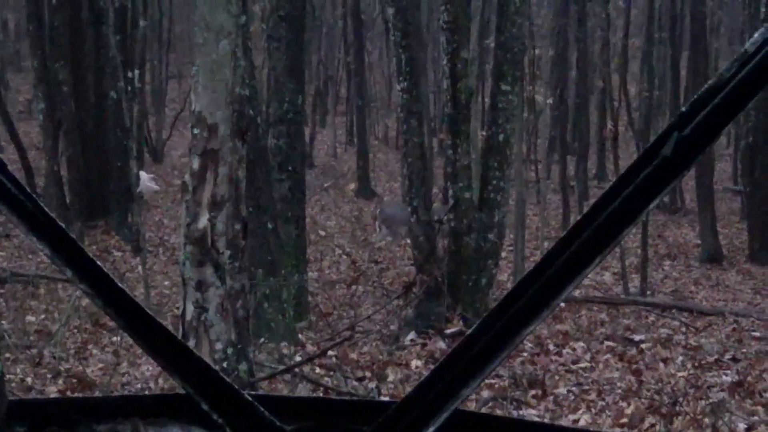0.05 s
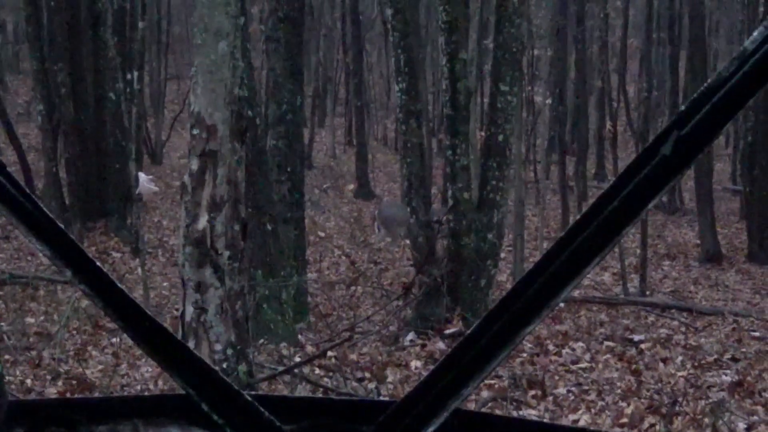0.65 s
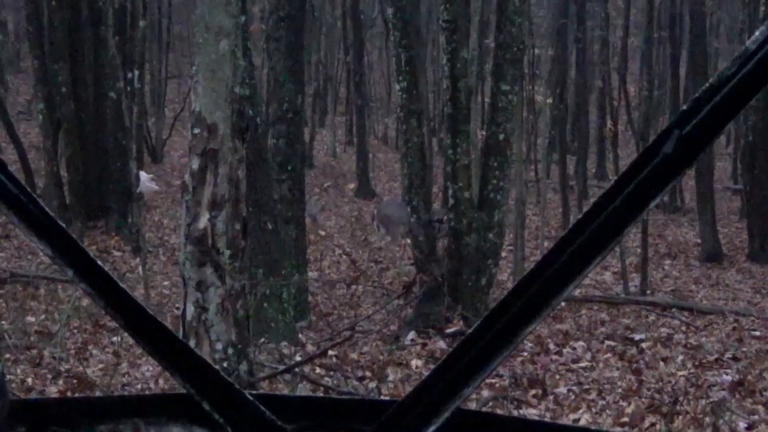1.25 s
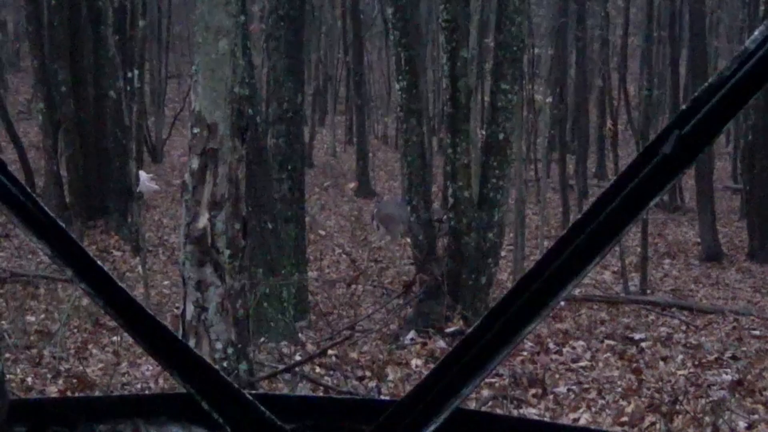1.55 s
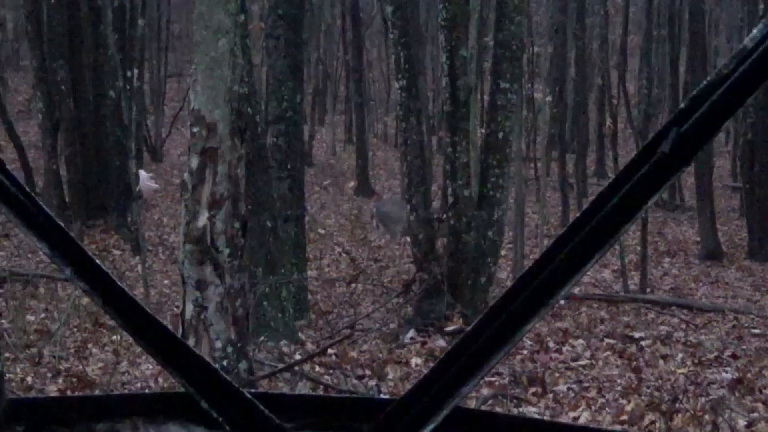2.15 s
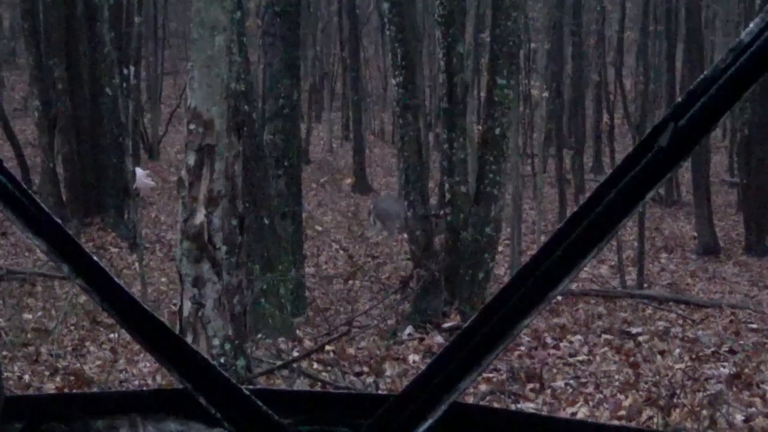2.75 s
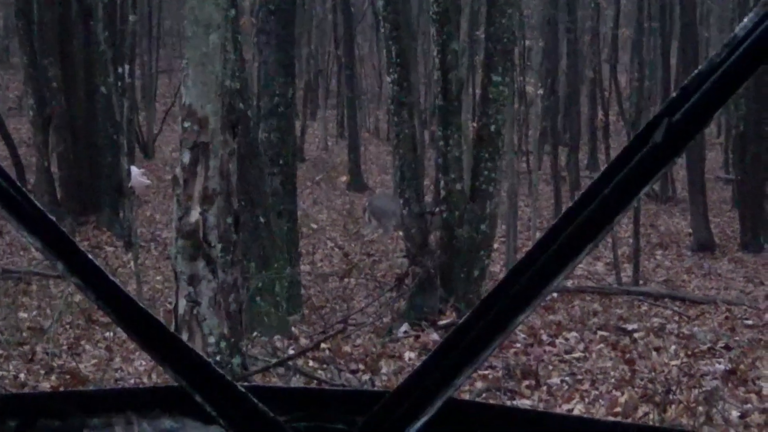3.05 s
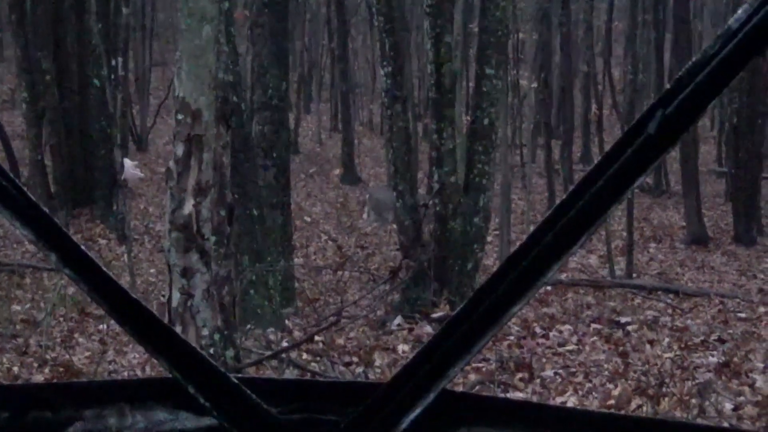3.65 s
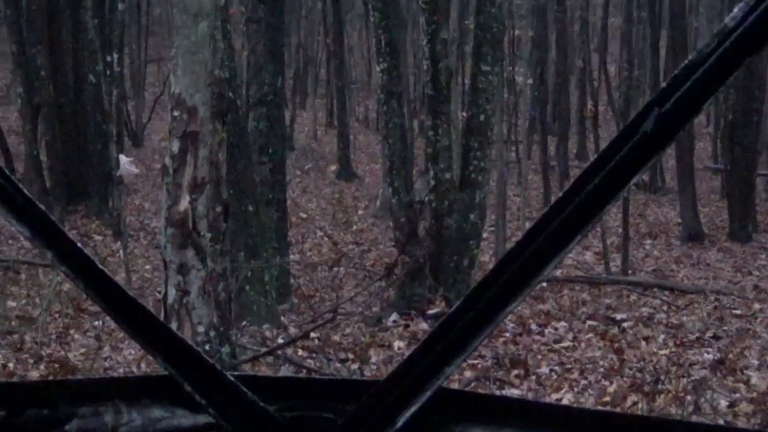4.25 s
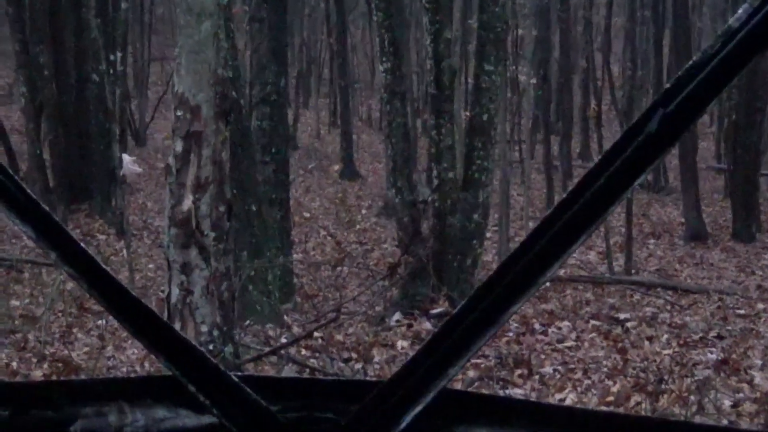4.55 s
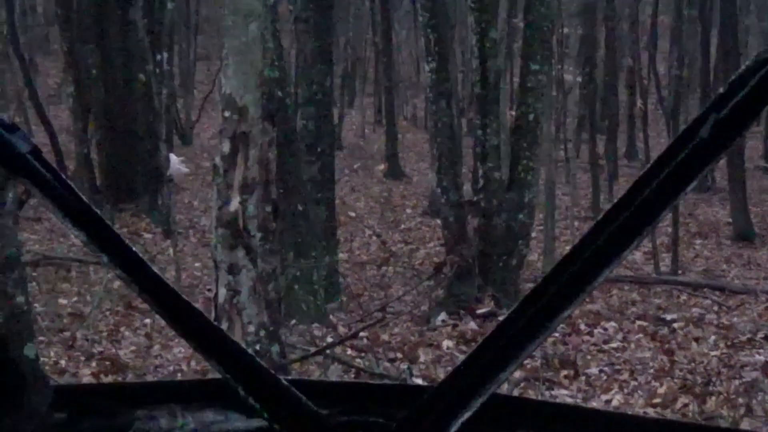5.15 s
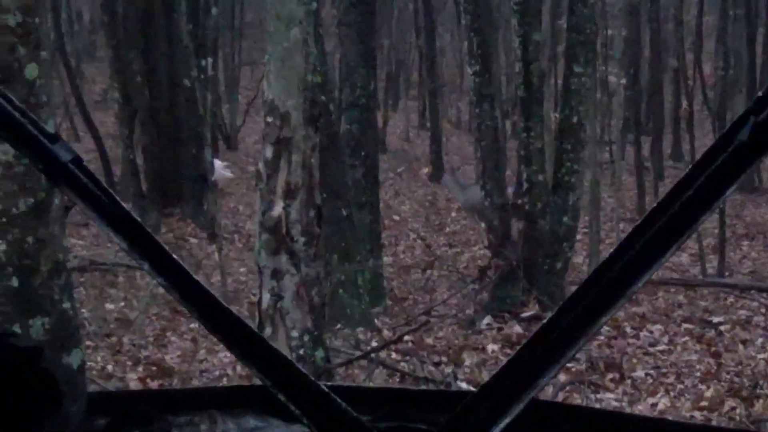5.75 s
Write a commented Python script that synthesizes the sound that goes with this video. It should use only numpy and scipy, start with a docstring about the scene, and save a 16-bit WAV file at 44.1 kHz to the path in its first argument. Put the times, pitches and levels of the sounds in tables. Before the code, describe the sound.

Light rain falls in the woods, heard from inside a fabric blind. A steady soft hiss with tiny ticks comes from the fallen leaves, over a faint low rumble. Close by, single drops pat irregularly on the cloth. About a second and a half in, one heavy drop gives a louder, sharp tap, and in the second half the pats grow somewhat stronger.

```python
"""Light rain on a fabric blind in the woods, heard from inside.
From the start, countless impacts on fallen leaves merge into a soft hiss over a faint low rumble.
Nearer drops pat the cloth: each impulse sets a patch ringing briefly while its spray scatters.
At 1.4 s one heavy drop gives a loud tap; from about 3.4 s to the end the pats are stronger."""
import sys
import numpy as np
from scipy import signal
from scipy.io import wavfile
from scipy.ndimage import uniform_filter1d

SR = 44100
rng = np.random.default_rng(int(sys.argv[2]) if len(sys.argv) > 2 else 0)


def file_out(sig):
    """Save sig as 16-bit WAV at sys.argv[1]."""
    # one column per channel
    cols = np.atleast_2d(sig).T
    # limit, then scale
    lim = np.clip(cols, -1, 1)
    pcm = np.round(lim * 32767).astype(np.int16)
    wavfile.write(sys.argv[1], SR, pcm)


N = 255780

# Prominent drops, each on its own patch of cloth: t/s, slap level/dB, lowest f of the patch/Hz,
# ring f/Hz, ring level re slap/dB, spray level/dB, left-right difference/dB
DROPS = [(0.3143, -45, 2400, 3290, -2, -63, -1.5), (0.401, -48.5, 170, 2430, -7, -49, -2.5),
         (1.1295, -50, 2000, 9470, -7, -51, -2.5), (1.2239, -44, 170, 1856, -5, -51, -2),
         (1.4917, -42.5, 800, 1680, -9, -55, 1), (1.809, -47.5, 600, 3790, -24, -48, -2),
         (1.971, -46.5, 1100, 5720, -6, -53, 1), (2.266, -54.5, 200, 1640, -8, -44, -2),
         (2.6603, -48, 1500, 4140, -2, -60, -3.5), (2.7046, -44, 450, 2050, -11, -66, 1),
         (2.7235, -45.5, 220, 2670, -8, -42.5, -2), (2.773, -42.5, 450, 632, 5, -47, -0.5),
         (2.830, -45.5, 200, 1430, -15, -46.5, 1), (3.4323, -32.5, 398, 3400, -12, -37, -1.5),
         (3.527, -31.5, 700, 830, -7.5, -48, 0), (3.5798, -49, 900, 3200, -14, -49, 2),
         (3.781, -46.5, 250, 2450, -10, -45, 0), (4.0242, -43.5, 300, 920, 4, -62, -2),
         (4.078, -45, 450, 1040, -6, -62, -2), (4.2698, -35.5, 170, 1563, -1.5, -55, 2),
         (4.2732, -34.5, 1000, 1750, -4, -41, -2), (4.551, -39, 170, 579, -5, -42, -2),
         (4.569, -46, 1200, 2620, 3, -46.5, 2.5), (4.6051, -40.5, 700, 2900, -10, -47, 3),
         (4.9423, -50, 400, 3440, -9, -47, -1), (5.0617, -39, 170, 760, -8, -58, -1),
         (5.07, -44.5, 260, 1380, -2, -52, 0), (5.3603, -34.5, 540, 2080, -1, -59, -4),
         (5.6194, -42.5, 232, 1570, -3, -54, 0)]


def patter():
    """Superposition: the sounds of separate impacts on the cloth add."""
    out = np.zeros((2, N))
    for onset, *impact in DROPS:
        add(out, onset, drop(*impact))
    return out


def drop(slap_db, lowest_hz, ring_hz, ring_db, spray_db, side_db, ring_cycles=13):
    """Impulse response of a membrane: a slap and the damped ring of the patch, joined by spray."""
    slack_hz, cloth_hz = 170, 2720
    bass_db = 11.5 - 7.5 * np.log2(lowest_hz / slack_hz)  # a slack patch thuds
    treble_db = -8.5 + 0.48 * (spray_db - slap_db)  # a drop that bursts slaps brighter
    spray_hz = cloth_hz * (ring_hz / cloth_hz) ** 0.22  # between the tones of cloth and patch
    colour = [(250, bass_db - 1.5), (500, bass_db), (850, 0.4 * bass_db + 2.5), (1700, 0.61),
              (3600, 0.23 * treble_db), (5800, treble_db + 4.0), (10500, 1.02 * treble_db)]
    slap = through(contact(flutter_db=4, t60=0.025), click(colour))
    # a taut patch hardly sounds below its lowest tone
    slap = burst(signal.lfilter(*signal.butter(3, lowest_hz, "highpass", fs=SR), slap))
    t = np.arange(slap.shape[1]) / SR
    attack = 1 - np.exp(-t / 0.00076)
    decay = amp(-60 * t / (0.022 + ring_cycles / ring_hz))
    ring = burst(np.sin(2 * np.pi * ring_hz * t) * attack * decay)
    ring *= np.sign(np.sum(slap * ring))  # the patch swings the way it is pushed
    pat = amp(slap_db) * burst(slap + amp(ring_db) * ring)
    return pan(side_db) * (pat + spray(spray_db, t60=0.12, tone_hz=spray_hz, treble_db=treble_db))


def contact(flutter_db, t60, spread_hz=2600, spread_q=1.17, flutter_hz=900):
    """Wave propagation: one sharp push, then short waves running to and fro in the cloth."""
    waves = amp(flutter_db) * scatter(rise_s=0.001, t60=t60, likeness=0.68, grain_db=5)
    waves = signal.lfilter(*signal.butter(1, [flutter_hz, 7000], "bandpass", fs=SR), waves)
    push = waves + burst(signal.unit_impulse(waves.shape[1]))
    # the cloth yields: an all-pass spreads the push over a millisecond
    return push - 2 * signal.lfilter(*signal.iirpeak(spread_hz, spread_q, fs=SR), push)


# Spectrum of the spray: f/Hz, relative level/dB
SPRAY_SPECTRUM = [(80, -18), (250, -1.5), (700, -1), (1200, 0.5), (2000, -2.5), (3300, 1), (5500, -0.5),
                  (9000, 1), (11000, -13.5)]


def spray(level_db, t60, tone_hz, treble_db, tone_db=3, tone_q=4.4):
    """Forced resonance: droplets from a splash fall back and stir the cloth around them."""
    colour = [(hz, db + 0.21 * treble_db * (hz > 5000)) for hz, db in SPRAY_SPECTRUM]
    droplets = through(scatter(rise_s=0.0044, t60=t60, likeness=0.69, grain_db=2), click(colour))
    stirred = signal.lfilter(*signal.iirpeak(tone_hz, tone_q, fs=SR), droplets)
    return amp(level_db) * burst(droplets + amp(tone_db) * stirred)


# The two contacts of the heavy drop: t/s, level/dB, left-right difference/dB
TAP_CONTACTS = [(1.4174, -35.5, 6), (1.42, -22, 0.5)]
# Spectrum of its knock: f/Hz, relative level/dB
TAP_SPECTRUM = [(300, -22), (385, 2.5), (540, 8), (900, 3.5), (1030, -10), (1380, -10), (1560, -1),
                (2100, -5), (2700, 4), (3540, 0.5), (3880, -11), (4450, 3.5), (4700, -9.5), (10500, -17.5)]


def heavy_tap():
    """Impact excitation: a large drop knocks the taut cloth close by and bursts."""
    out = np.zeros((2, N))
    for onset, level_db, side_db in TAP_CONTACTS:
        push = contact(flutter_db=-5, t60=0.016, spread_hz=3000, spread_q=1.5, flutter_hz=2800)
        knock = burst(through(push, click(TAP_SPECTRUM)))
        add(out, onset, -amp(level_db) * pan(side_db) * knock)
    add(out, TAP_CONTACTS[-1][0], spray(level_db=-33, t60=0.067, tone_hz=3150, treble_db=-12))
    return out


# Strength of the rain, used as swings about each mean: t/s, leaf level/dB, cloth level/dB
RAIN_STRENGTH = [(0.0, -56.5, -64), (0.77, -57, -61.5), (1.1, -58, -64), (2.55, -57.5, -63),
                 (3.39, -57, -60), (3.62, -55.5, -59.5), (3.83, -56.5, -63), (4.55, -56.5, -57),
                 (4.97, -57, -60.5), (5.8, -57, -62.5)]


def drizzle(base_db=-57.5, spread_db=1.4, spray_below_db=10, width_db=6, rain_follow=1.4, count=85):
    """Random arrivals: small drops tick or splash on the cloth, harder as the rain thickens."""
    out = np.zeros((2, N))
    times, rain_db, _ = np.transpose(RAIN_STRENGTH)
    for when, size, slack, dryness, patch, side in rng.random((count, 6)):
        onset = when * N / SR
        heavier_db = rain_follow * np.interp(onset, times, rain_db - rain_db.mean())
        slap_db = base_db + heavier_db + spread_db * min(-np.log(1 - size), 3)
        ring_hz = 600 * 8 ** patch
        sound = drop(slap_db, lowest_hz=ring_hz / 4 ** slack, ring_hz=ring_hz, ring_db=-4,
                     spray_db=slap_db - spray_below_db * dryness, side_db=width_db * (side - 0.5))
        add(out, onset, sound)
    return out


def leaf_ticks(level_db=-66, per_s=600, spread_db=3.5, clump_db=6.0, cycles=4.4, count=24):
    """Damped oscillation: drops tick on dry leaves in flurries, each leaf at its own pitch and place."""
    out, t = np.zeros((2, N)), np.arange(128) / SR
    flurry = amp(clump_db * unit(uniform_filter1d(rng.standard_normal(N), 1500)))
    for hz in np.linspace(2500, 11000, count):
        hits = np.flatnonzero(rng.random(N - len(t)) < per_s / count / SR)
        size_db = spread_db * np.minimum(rng.exponential(1, size=1000)[:len(hits)], 4)
        tick = np.sin(2 * np.pi * hz * t) * np.exp(-2 * hz * t / cycles) * np.sqrt(hz)
        ticks = np.outer(flurry[hits] * amp(size_db), tick)
        samples = hits[:, None] + np.arange(len(t))
        leaf = np.bincount(samples.ravel(), ticks.ravel(), N)
        out += pan(rng.uniform(-6, 4.0)) * leaf
    return amp(level_db) * unit(out)


# Rain on the leaves and far rumble: f/Hz, relative spectral density level/dB
LEAF_SPECTRUM = [(15, -14), (30, -10), (55, -0.5), (100, 1), (160, 0.5), (290, -3.5), (480, -1),
                 (950, -1.5), (2200, -4.5), (4800, -8.5), (8100, -12.5), (10000, -13.5), (11200, -24)]
# The cloth drumming under the finest drops: f/Hz, relative spectral density level/dB
DRUM_SPECTRUM = [(100, -53), (400, -50), (590, 5.5), (780, -7.5), (1050, -45), (3000, -51)]


def hiss(hiss_db=-53.5, drum_db=-69, leaves_follow=0.73, drum_follow=2.1):
    """Incoherent summation: the noise of leaves and cloth grows with the strength of the rain."""
    times, *levels = np.transpose(RAIN_STRENGTH)
    leaves, cloth = (np.interp(np.arange(N) / SR, times, db - np.mean(db)) for db in levels)
    far = amp(hiss_db + leaves_follow * leaves) * wash(LEAF_SPECTRUM, patchy_db=1.4, swell_db=0.14)
    drumming = amp(drum_db + drum_follow * cloth) * wash(DRUM_SPECTRUM, patchy_db=3.5, swell_db=2)
    return far + drumming


# Likeness of the two channels in the hiss: f/Hz, coherence
COHERENCE = [(50, 1), (150, 0.89), (500, 0.51), (1000, 0.32), (3000, 0.61), (8000, 0.69)]


def wash(colour, patchy_db, swell_db):
    """Central limit theorem: countless tiny impacts merge into Gaussian noise, here faintly patchy."""
    frames, hz = N // 512 + 5, np.fft.rfftfreq(2048, 1 / SR)
    a, b, c, d, patches = rng.standard_normal((5, frames, len(hz)))
    patches = unit(uniform_filter1d(uniform_filter1d(patches, 4, 0), 50, 1))
    swell = unit(uniform_filter1d(rng.standard_normal(frames), 10))[:, None]
    spectra = pair(a + 1j * b, c + 1j * d, read(COHERENCE, hz))
    spectra *= amp(read(colour, hz) + patchy_db * patches + swell_db * swell)
    _, noise = signal.istft(spectra.swapaxes(1, 2), nperseg=2048, noverlap=1536)
    return unit(noise[:, :N])


def scatter(rise_s, t60, likeness, grain_db, size=4000):
    """Exponential decay: a swarm of tiny uneven clicks falls 60 dB in t60 seconds."""
    t = np.arange(size) / SR
    a, b, sizes = rng.standard_normal((3, size))
    grains = amp(grain_db * unit(uniform_filter1d(sizes, 24)))
    return burst(pair(a, b, likeness) * grains * (1 - np.exp(-t / rise_s)) * amp(-60 * t / t60))


def click(colour, size=1024):
    """Minimum phase: the sharpest causal pulse with this spectrum."""
    hz = abs(np.fft.fftfreq(size, 1 / SR))
    log_gain = np.log(amp(read(colour, hz)))
    spectrum = np.exp(np.conj(signal.hilbert(log_gain)))
    return np.fft.ifft(spectrum).real[:size // 2]


def through(x, pulse):
    """Convolution: a pulse colours both channels."""
    return signal.fftconvolve(x, pulse[None], axes=1)[:, :x.shape[1]]


def pair(a, b, likeness):
    """Partial coherence: sum and difference of two unrelated signals form two channels."""
    c = np.clip(likeness, 0, 1)
    return np.sqrt((1 + c) / 2) * a + np.sqrt((1 - c) / 2) * np.array([b, -b])


def pan(db):
    """Localisation by level difference: left and right gains."""
    return amp([[db / 2], [-db / 2]])


def add(mix, onset, sound):
    """Superposition: a stereo sound joins the mix at onset seconds."""
    part = mix[:, max(round(onset * SR), 0):][:, :sound.shape[1]]
    part += sound[:, :part.shape[1]]


def read(points, hz):
    """Interpolation of (f/Hz, value) points on a log-frequency axis."""
    f, value = np.transpose(points)
    return np.interp(np.log(hz + 1), np.log(f + 1), value)


def burst(x):
    """Energy normalisation to that of 5 ms at rms 1."""
    energy = np.sum(np.atleast_2d(x) ** 2, -1).mean()
    return x * np.sqrt(0.005 * SR / (energy + 1e-20))


def unit(x):
    """Power normalisation to rms 1."""
    return x / np.sqrt(np.mean(x ** 2) + 1e-20)


def amp(db):
    """Amplitude ratio of a level in decibels."""
    return 10 ** (np.asarray(db) / 20)


def scene():
    """Superposition of the rain in the woods and the near drops on the blind."""
    return hiss() + leaf_ticks() + drizzle() + patter() + heavy_tap()


def record(dry):
    """Band limiting: a linear-phase low-pass removes the highest treble."""
    lowpass = signal.firwin(511, cutoff=11130, window=("kaiser", 7), fs=SR)
    return signal.oaconvolve(dry, lowpass[None], "same")


dry = scene()
out = record(dry)
file_out(out)
```